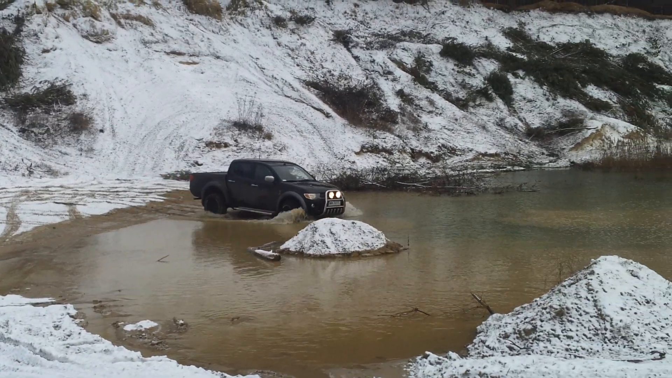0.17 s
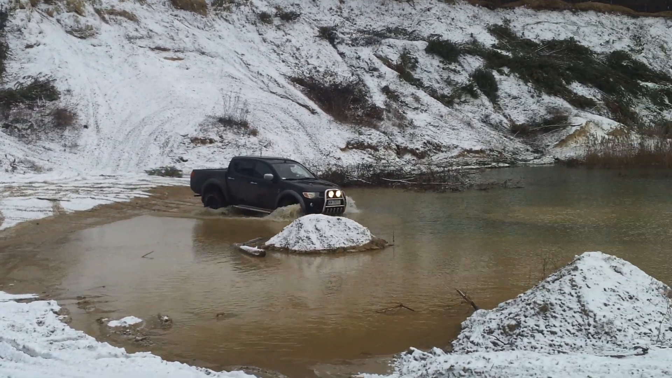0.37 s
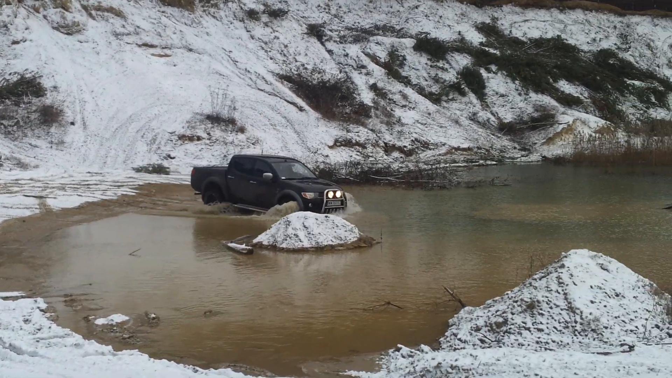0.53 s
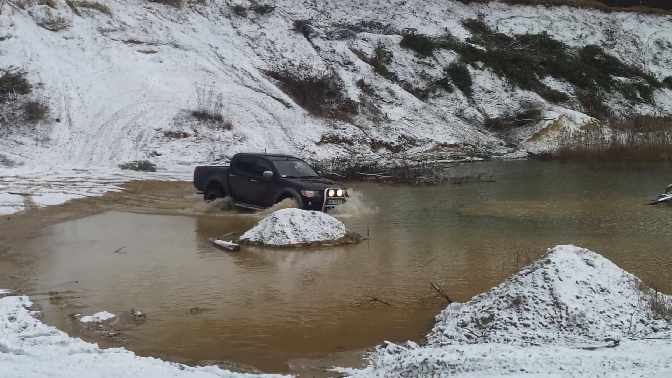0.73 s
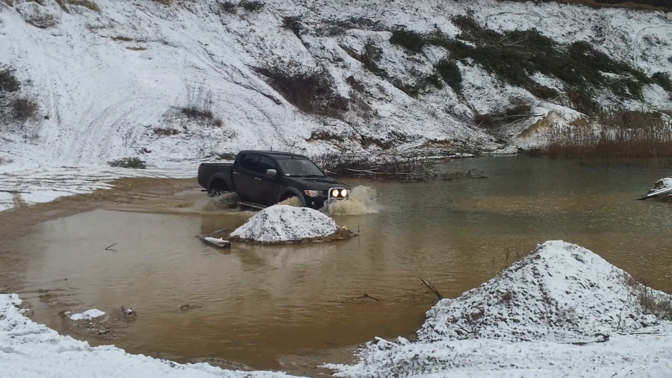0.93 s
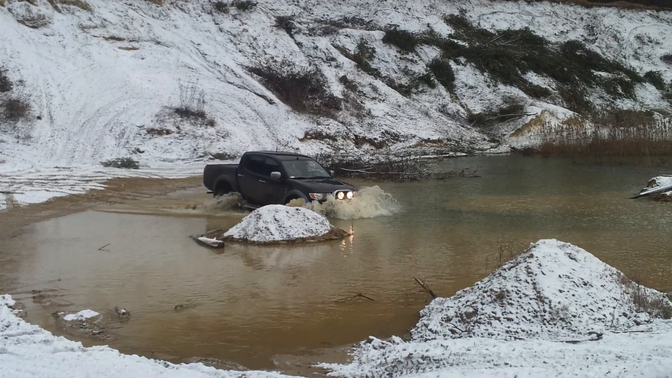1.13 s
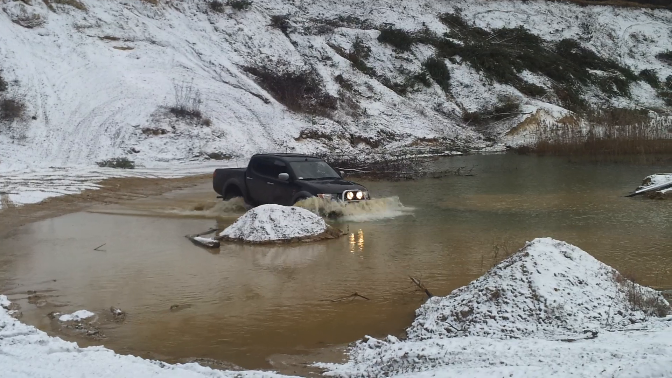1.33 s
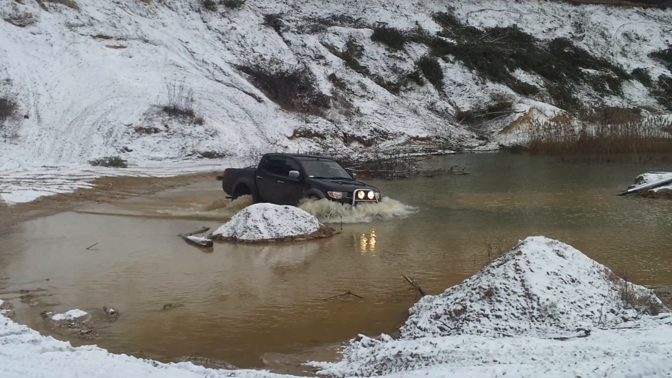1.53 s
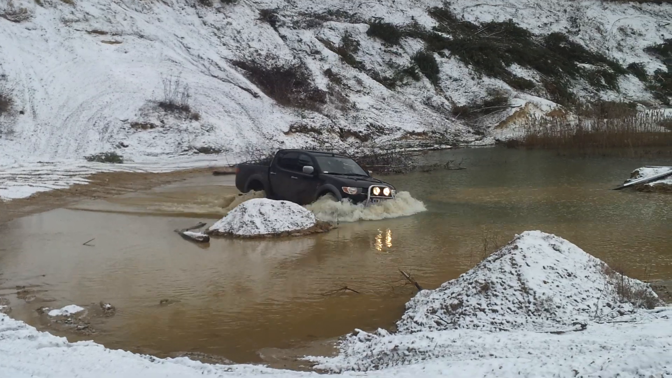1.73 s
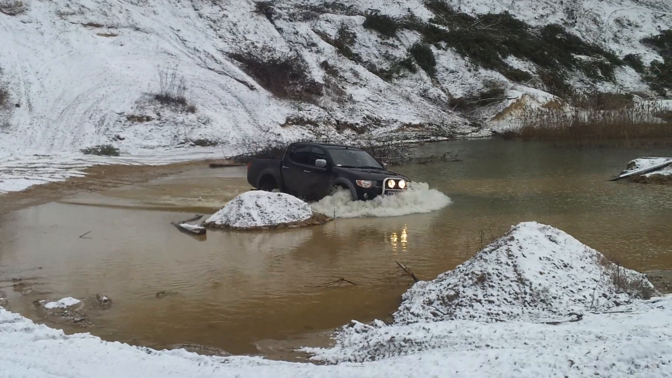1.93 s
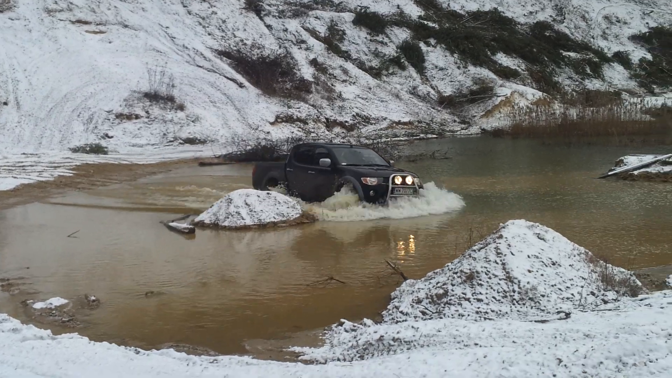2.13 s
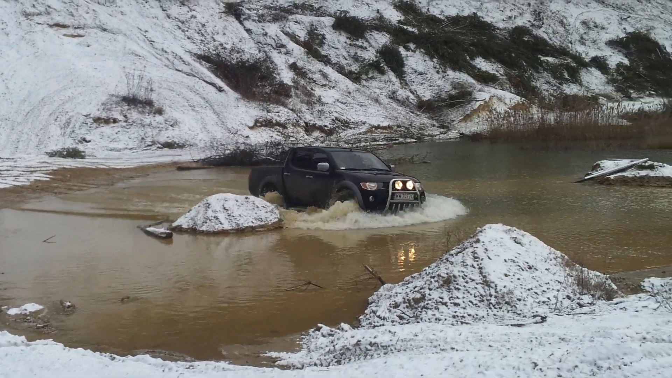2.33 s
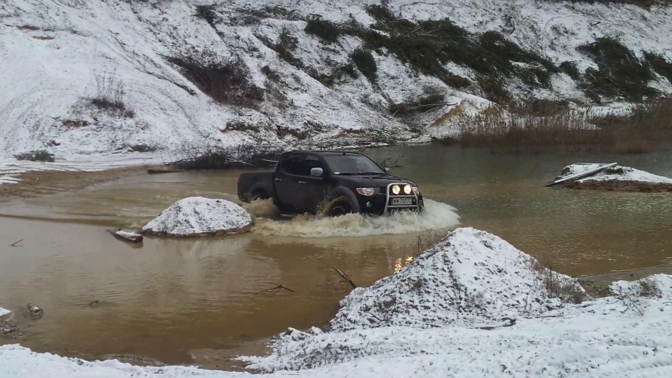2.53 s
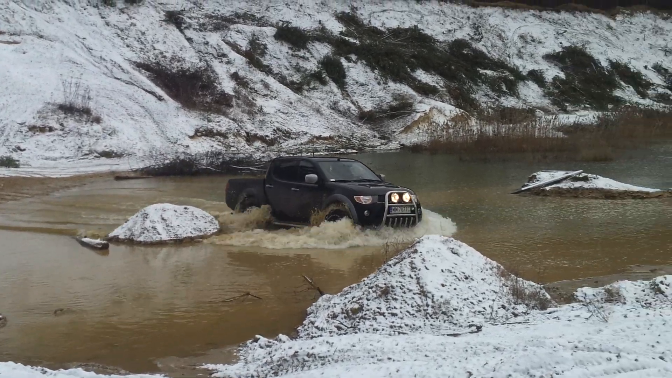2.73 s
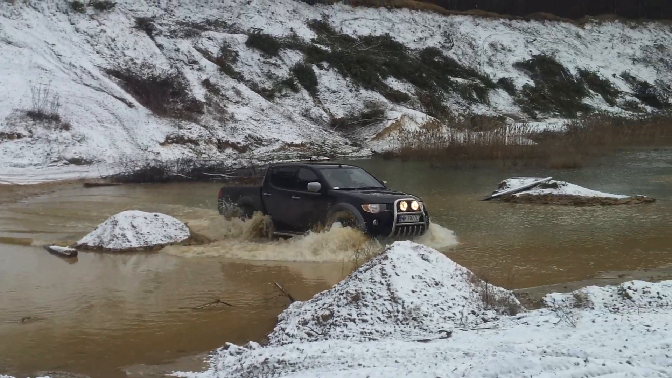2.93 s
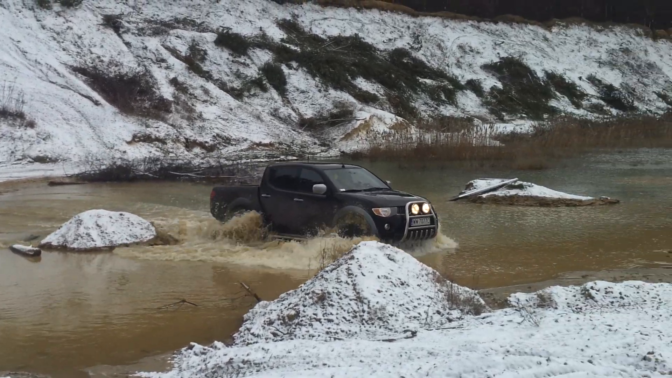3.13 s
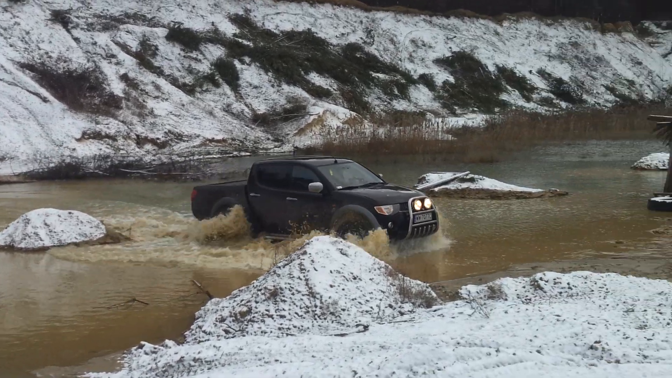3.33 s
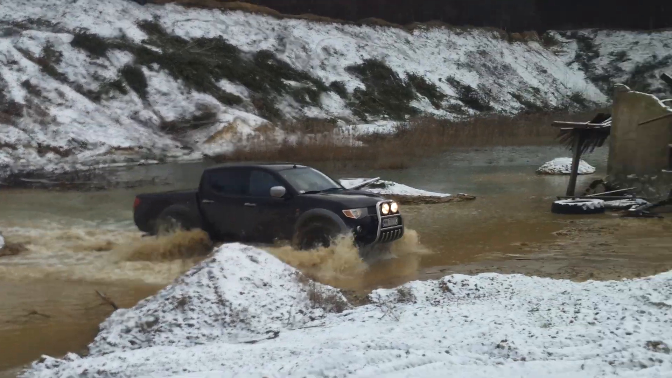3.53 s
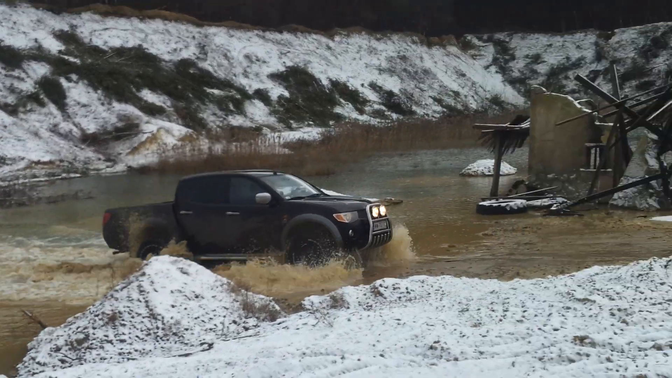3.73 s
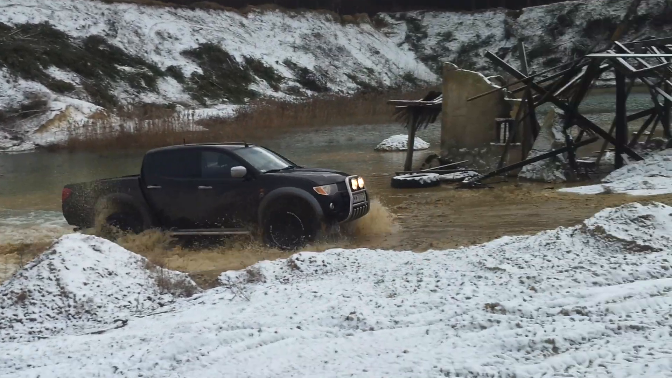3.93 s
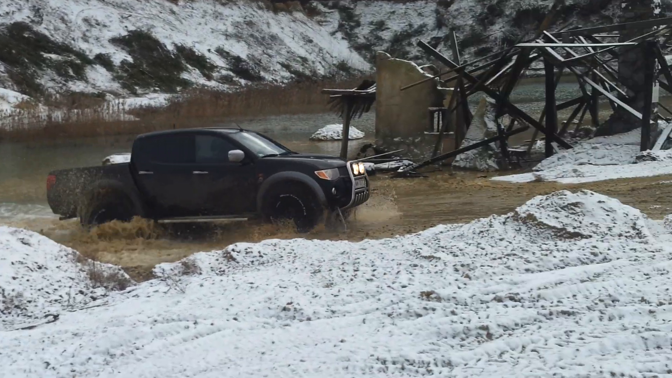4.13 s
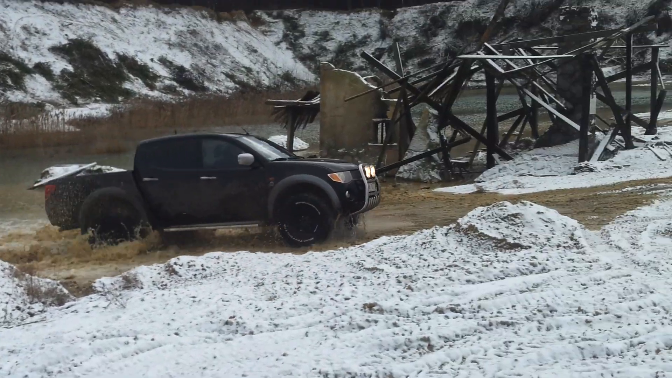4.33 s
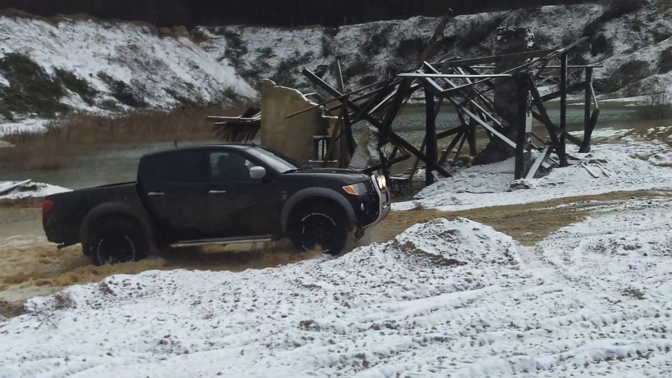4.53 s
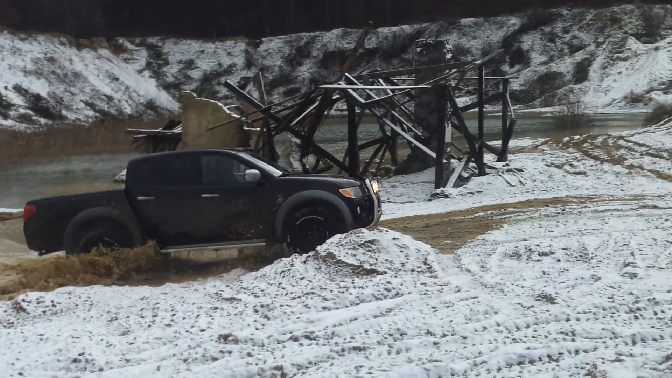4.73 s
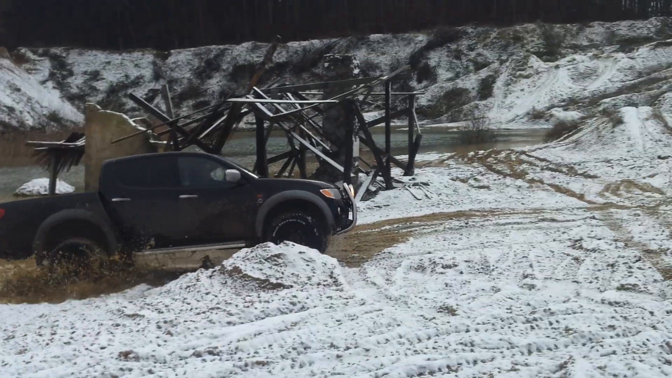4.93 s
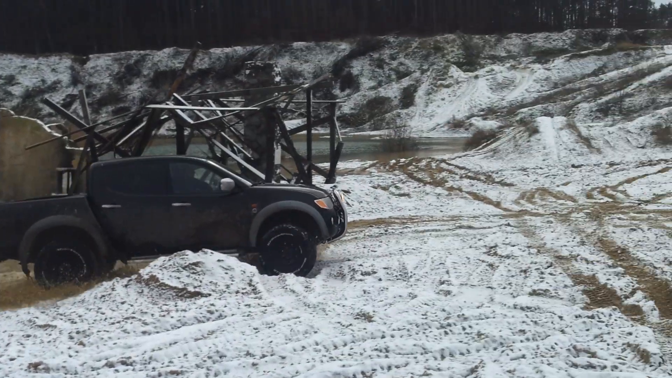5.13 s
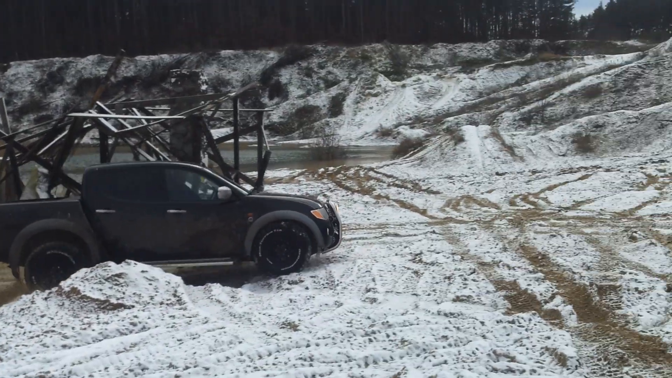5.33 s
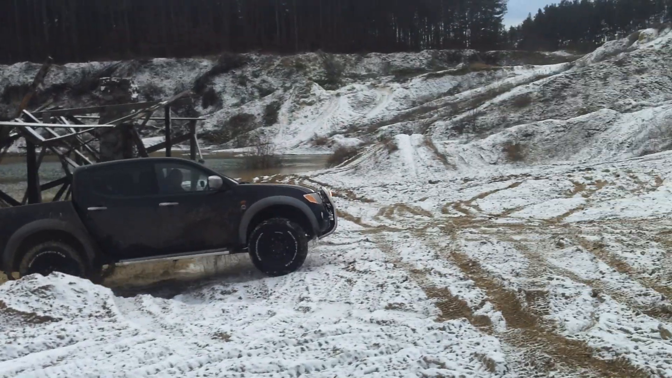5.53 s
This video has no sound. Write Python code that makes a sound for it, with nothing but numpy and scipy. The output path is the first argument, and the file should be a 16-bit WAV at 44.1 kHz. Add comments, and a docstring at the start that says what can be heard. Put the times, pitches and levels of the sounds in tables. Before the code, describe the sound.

Outdoors in an open gravel pit, a diesel pickup drives through shallow water. Its clattery engine revs, drops to a labouring growl, then climbs again as it approaches. Bubbling wash and hissing wheel spray swell, then ease as it reaches the bank. Low wind gusts thump and flutter on the single microphone, strongest at the end.

```python
"""A diesel pickup wades through a flooded gravel pit and climbs the bank close by.
Exhaust tones, boom and clatter follow its firing rate, which sags in the deep water and picks up again.
The bow wave and wheel spray are patchy noise and ringing bubbles; slaps are short rushes of noise.
Wind rumbles low in gusts, and eddies strike the microphone as pops and flutters, strongest late on.
Nearby reflections hollow out narrow bands of the truck's sound."""
import sys
import numpy as np
from scipy import signal
from scipy.fft import rfft, irfft
from scipy.io import wavfile
from scipy.ndimage import uniform_filter1d

SR = 44100
rng = np.random.default_rng(int(sys.argv[2]) if len(sys.argv) > 2 else 0)


def persist_wave(psi):
    """Save psi, clipped to +-1, as 16-bit WAV."""
    counts = np.round(np.clip(psi, -1, 1) * 32767).astype(np.int16)
    wavfile.write(sys.argv[1], SR, np.atleast_2d(counts).T)


N = 250488
TIME = np.arange(N) / SR
BINS_HZ = np.fft.rfftfreq(N, 1 / SR)


def amp(db):
    """Decibels to gain."""
    return 10 ** (np.asarray(db) / 20)


def unit(x):
    """Scales to an rms of one."""
    return x / np.sqrt(np.mean(x ** 2) + 1e-20)


def follow(rows):
    """Draws each column of an automation table as a curve over every sample."""
    times, *columns = np.transpose(rows)
    return [np.interp(TIME, times, column) for column in columns]


def colour(x, points):
    """Filters a signal with an EQ curve (frequency [Hz], gain [dB]), then sets its rms to one."""
    hz, db = np.transpose(points)
    gain_db = np.interp(np.log(BINS_HZ + 1), np.log(hz), db)
    return unit(irfft(rfft(x) * amp(gain_db), N))


def wander(rate_hz):
    """Slow random drift with an rms of one, mostly below rate_hz."""
    lowpass = np.exp(-(BINS_HZ / rate_hz) ** 2)
    return unit(irfft(rfft(rng.standard_normal(N)) * lowpass, N))


def patchy(depth_db):
    """Noise that swells and thins in small patches of time and pitch."""
    z = signal.stft(rng.standard_normal(N), nperseg=512, noverlap=384)[2]
    patches = rng.standard_normal(z.shape)
    patches = uniform_filter1d(patches, 9, axis=0)  # about 780 Hz wide
    patches = uniform_filter1d(patches, 10, axis=1)  # about 29 ms long
    noise = signal.istft(z * amp(depth_db * unit(patches)), nperseg=512, noverlap=384)[1]
    return unit(noise[:N])


def burst(length, band, core=0):
    """A short swell of filtered noise; core is the share held by one sharp pressure dip."""
    dip = -np.fft.fftshift(irfft(band))
    t = (np.arange(len(dip)) - len(dip) // 2) / SR
    swell = np.exp(-2 * (2 * t / length) ** 2)
    swirl = irfft(rfft(swell * rng.standard_normal(len(t))) * band)
    blend = (1 - core) * unit(swirl) + core * unit(dip)
    return np.sqrt(np.mean(swell ** 2)) * unit(blend)


def add(mix, centre_s, sound):
    """Mixes a short sound in, centred on a time in seconds."""
    start = max(round(centre_s * SR) - len(sound) // 2, 0)
    part = mix[start:][:len(sound)]
    part += sound[:len(part)]


# how the exhaust pipe passes the firing tones: (frequency [Hz], gain [dB])
PIPE_RESONANCE = [(45, -4), (55, 0), (62, 3.5), (72, -1.5), (88, -1.5), (98, -9), (113, 4), (135, -4.5),
                  (172, 3.5), (200, 2.5), (250, -4), (400, -5.5), (800, -7)]
# strength of the exhaust note, before pipe and harmonic gains: (time [s], level [dB])
EXHAUST_LEVEL = [(0, -46.5), (.33, -46.5), (.6, -52), (1.1, -48.5), (1.6, -45), (2.35, -41.5), (3.5, -43.5),
                 (4.35, -41.5), (4.8, -46), (5.17, -34.5), (5.68, -41)]


def exhaust(turns, firing_hz, flutter_db=3, uneven_db=-12, harmonic_fall_db=2.5):
    """Firing harmonics swell across pipe resonances; unequal cylinders add weak tones in between."""
    hz, db = np.transpose(PIPE_RESONANCE)
    strength_db, = follow(EXHAUST_LEVEL)
    out = np.zeros(N)
    for k in [*range(1, 10), 1.5, 2.5, 3.5]:
        level_db = np.interp(np.log(k * firing_hz), np.log(hz), db)
        level_db -= harmonic_fall_db * (k - 1)
        if k % 1 > 0:
            level_db += uneven_db
        tone = np.sin(2 * np.pi * (k * turns + rng.random()))
        out += amp(level_db + flutter_db * wander(7.2)) * tone
    return np.sqrt(2) * amp(strength_db) * out


# engine speed before jitter, sagging in the deep water and again on the bank:
# (time [s], firing rate [firings per second])
FIRING_RATE = [(0, 85), (.6, 95), (1.05, 96), (1.28, 88), (1.4, 62), (1.6, 55), (2, 58), (2.17, 61.5),
               (2.45, 61), (2.75, 68.5), (3.4, 81), (3.8, 85), (4.1, 83), (4.35, 86), (4.55, 82), (5.1, 66),
               (5.68, 78)]
# engine loudness; clatter_db lifts the clatter: (time [s], boom level [dB], clatter level [dB])
ENGINE_LOAD = [(0, -52, -35.5), (.55, -41.5, -35), (.9, -43, -36.5), (1.72, -44.5, -35.5),
               (2.05, -45, -31.5), (2.4, -38, -35), (3.8, -31, -37.5), (4.15, -38.5, -36.5),
               (4.55, -37, -31.5), (4.8, -37.5, -32), (5.68, -27.5, -33.5)]
# boom of the pipe and body: (frequency [Hz], relative level per Hz [dB])
BOOM_COLOUR = [(30, -12), (70, -3), (120, 1), (180, 5), (240, 2), (330, -8), (450, -11.5), (800, -47)]
# clatter of the block: (frequency [Hz], relative level per Hz [dB])
BLOCK_COLOUR = [(50, -10), (150, -9), (270, -1), (400, -6.5), (560, 0.5), (850, 0), (1300, 1.5),
                (1900, -2.5), (2500, -6), (3600, -10.5), (5500, -23), (10000, -59)]


def engine(jitter=.012, clatter_db=2.0):
    """Each firing puffs into the pipe and knocks on the block."""
    firing_hz, = follow(FIRING_RATE)
    turns = np.cumsum(firing_hz * (1 + jitter * wander(14))) / SR  # firings so far
    boom_db, block_db = follow(ENGINE_LOAD)
    # every firing gives a surge that dies away before the next one
    stroke = .8 + np.exp(-(turns % 1) / .35)
    boom = amp(boom_db) * colour(stroke * rng.standard_normal(N), BOOM_COLOUR)
    clatter = amp(block_db + clatter_db) * colour(stroke * patchy(depth_db=1.14), BLOCK_COLOUR)
    return exhaust(turns, firing_hz) + boom + clatter


def bubbles(per_s, low_hz, high_hz, cycles, spread_db, rise, count=28):
    """Drops trap bubbles of many sizes; each rings briefly and rises in pitch."""
    out = np.zeros(N)
    for hz in np.geomspace(low_hz, high_hz, count):
        age = np.arange(int(cycles / hz * SR) + 2) * hz / cycles / SR  # 0 to 1 over the ring
        ring = np.sin(2 * np.pi * cycles * age * (1 + rise * age))
        ring *= np.exp(-np.log(100) * age)  # falls 40 dB
        strengths = amp(spread_db * np.minimum(rng.exponential(1, N), 4))
        hits = rng.random(N) < per_s / count / SR
        out += signal.oaconvolve(strengths * hits, ring / np.linalg.norm(ring))[:N]
    return unit(out)


# steady wash, growing as the truck nears and easing as it leaves the water, before slosh and
# the churn_db lift: (time [s], churn level [dB], spray level [dB])
STEADY_WASH = [(0, -37, -49), (.8, -37, -44), (1.75, -35, -40.5), (2.5, -33.5, -34.5), (3.5, -32, -33),
               (4.2, -29.5, -28.5), (4.58, -30.5, -28), (4.75, -36.5, -31.5), (5.68, -34, -35)]
# surges of water thrown up by the wheels, before slosh and the churn_db lift:
# (start [s], length [s], churn level [dB], spray level [dB])
WHEEL_SURGES = [(0, 0.32, -40, -44.5), (.92, 0.17, -40, -49), (1.193, 0.31, -35, -49),
                (1.622, 0.092, -37, -35), (1.78, 0.17, -36.5, -41), (2.04, 0.17, -39, -40),
                (2.803, .17, -36, -40), (3.508, 0.53, -33.5, -28), (4.916, .5, -46, -28)]


def water_levels(rise_share=0.53):
    """Churn and spray in dB: each surge builds and falls back on top of the steady wash."""
    power = amp(follow(STEADY_WASH)) ** 2
    for start, length, churn_db, spray_db in WHEEL_SURGES:
        # the surge peaks after rise_share of its length
        progress = np.interp((TIME - start) / length, [0, rise_share, 1], [0, .5, 1])
        power += (amp([[churn_db], [spray_db]]) * np.sin(np.pi * progress)) ** 2
    return 10 * np.log10(power)


# colour of the bow wave: (frequency [Hz], gain [dB])
CHURN_COLOUR = [(150, -26), (400, -8), (700, -5), (1400, -3), (2500, -3.5), (3300, -2), (3800, 0.5),
                (4500, -1), (5500, -2), (7000, -3.5), (9700, -19.5), (10700, -70)]
# colour of the wheel spray: (frequency [Hz], gain [dB])
SPRAY_COLOUR = [(1500, -10.5), (3500, -4.5), (5200, -8), (6300, -1), (7000, -1), (8000, -4), (9000, -9.5),
                (10000, -13), (10500, -26.5), (11200, -15)]


def water(churn_db=2.5, gurgle=0.36, patter=0.42, slosh_db=0.52):
    """The bow wave folds over into bubbles; spray from the wheels rains back as fine drops."""
    churn_level, spray_level = water_levels()
    slosh = slosh_db * wander(24)
    large = bubbles(per_s=2200, low_hz=450, high_hz=5500, cycles=13, spread_db=2.8, rise=.08)
    fine = bubbles(per_s=4500, low_hz=3000, high_hz=9000, cycles=5, spread_db=3.2, rise=.05)
    wave = colour(patchy(depth_db=1.26) + gurgle * large, CHURN_COLOUR)
    drops = colour(patchy(depth_db=1.5) + patter * fine, SPRAY_COLOUR)
    return amp(churn_level + churn_db + slosh) * wave + amp(spray_level + slosh) * drops


# gusts of wind: (start [s], hold including the rise [s], level [dB])
WIND_GUSTS = [(1.38, 1.9, -44), (1.88, .1, -39), (2.95, 0.74, -42), (3.278, 0.21, -29), (4.42, 0.27, -41.5),
              (4.806, 0.29, -30), (5.27, .42, -26)]
# rumble of the wind: (frequency [Hz], gain [dB])
WIND_COLOUR = [(12, -23), (28, -1), (50, 5.5), (100, 1), (200, -5.5), (300, -18), (500, -17), (1000, -53),
               (3000, -55)]


def wind(breeze_db=-56, rise_s=0.04, fade_s=0.11, lumpy_db=2.5):
    """Lumpy low turbulence at the microphone port: gusts build, hold and die away over a light breeze."""
    power = amp(breeze_db) ** 2
    for start, hold, db in WIND_GUSTS:
        rise = np.clip((TIME - start) / rise_s, 0, 1)
        fade = np.exp(-np.maximum(TIME - start - hold, 0) / fade_s)
        power = power + (amp(db) * rise * fade) ** 2
    lumps = rng.standard_normal(N) * amp(lumpy_db * wander(35))
    return np.sqrt(power) * colour(lumps, WIND_COLOUR)


# slaps of water and mud against the truck:
# (middle [s], level at the top of the swell [dB], length [s], pitch [Hz])
WATER_SLAPS = [(.247, -31, .014, 1380), (0.322, -25, 0.0053, 1290), (5.306, -25.5, 0.033, 1400)]


def slaps(octaves=0.34, size=8192):
    """Each slap is a brief rush of noise about its pitch."""
    hz = np.fft.rfftfreq(size, 1 / SR) + 1
    out = np.zeros(N)
    for middle, db, length, pitch_hz in WATER_SLAPS:
        band = 1 / (1 + (np.log2(hz / pitch_hz) / octaves) ** 2)
        add(out, middle, amp(db) * burst(length, band))
    return out


# strong eddies striking the microphone:
# (middle [s], level at the top of the swell [dB], length [s], pitch [Hz])
EDDIES = [(1.511, -26.5, 0.075, 168), (1.6, -29, .012, 200), (1.955, -30, 0.057, 160),
          (2.307, -30.5, .018, 170), (2.61, -28, 0.015, 150), (3.151, -17, 0.016, 350),
          (3.168, -20, 0.055, 350), (3.183, -20, .014, 318), (3.341, -26, 0.022, 158),
          (3.381, -19.5, .018, 95), (3.423, -24, 0.028, 164), (3.467, -21.5, 0.066, 233),
          (4.864, -18.5, .034, 205), (4.919, -25, .012, 286), (4.952, -25, 0.026, 258),
          (5.158, -26.5, 0.049, 200), (5.314, -21.5, 0.034, 146), (5.355, -21.5, 0.015, 300),
          (5.394, -15.5, 0.024, 172), (5.415, -21.5, 0.015, 340), (5.457, -27, 0.055, 402),
          (5.583, -13, 0.035, 192), (5.654, -21, 0.017, 320), (5.673, -18.5, 0.029, 201)]


def buffets(top_ratio=1.76, core_s=0.018, size=8192):
    """Eddies hit the port: small ones pop, long ones flutter, fast ones reach higher in pitch."""
    hz = np.fft.rfftfreq(size, 1 / SR) + 1
    out = np.zeros(N)
    for middle, db, length, pitch_hz in EDDIES:
        ratio = hz / pitch_hz
        band = 1 / np.hypot(1, 1.1 * (ratio - 1 / ratio))
        band /= 1 + (ratio / top_ratio) ** 2  # extra treble roll-off
        add(out, middle, amp(db) * burst(length, band, core=np.exp(-length / core_s)))
    return out


# hollows that nearby reflections cut into the truck, before the bearing shifts them:
# (centre [Hz], width [Hz], gain [dB])
REFLECTION_HOLLOWS = [(980, 154, -4.5), (1625, 112, -7.5), (2215, 114, -10.5), (2658, 183, -7.5),
                      (3470, 79, -3.5), (4058, 121, -6), (4610, 130, -5), (5156, 132, -4),
                      (5820, 140, -2.5), (7100, 57, -5), (7720, 68, -2), (8330, 86, -2)]
# how the hollows shift with the truck's bearing:
# (time [s], factor on their pitch, factor on their depth at 4 kHz before the pitch shift)
TRUCK_BEARING = [(0, 0.98, 1.1), (1, 0.99, 1.57), (2.4, 1.015, 0.91), (3.8, 0.99, 1.15), (4.5, 0.992, 0.88),
                 (5.1, .997, 1.07), (5.68, 1.01, 0.68)]


def reflections(x):
    """Close reflections cancel narrow bands; depth varies most in the upper hollows."""
    hz, t, z = signal.stft(x, SR, nperseg=1024, noverlap=768)
    times, stretch, depth = np.transpose(TRUCK_BEARING)
    shifted = hz[:, None] / np.interp(t, times, stretch)
    hollow_db = np.zeros(z.shape)
    for centre, width, db in REFLECTION_HOLLOWS:
        hollow_db += db * np.exp(-.5 * ((shifted - centre) / width) ** 2)
    # a depth factor below one fills in the upper hollows, as when the spray spreads wide
    hollow_db *= np.interp(t, times, depth) ** (shifted / 4000)
    return signal.istft(z * amp(hollow_db), SR, nperseg=1024, noverlap=768)[1][:N]


def scene():
    """The truck is heard across the pit; the wind acts right at the single microphone."""
    truck = reflections(engine() + water() + slaps())
    return np.tile(truck + wind() + buffets(), (2, 1))


def record(dry, edge_hz=10800):
    """A steep low-pass ends the treble at edge_hz."""
    lowpass = signal.firwin(301, edge_hz, window=("kaiser", 9), fs=SR)
    return signal.oaconvolve(dry, lowpass[None], "same")


dry = scene()
out = record(dry)
persist_wave(out)
```